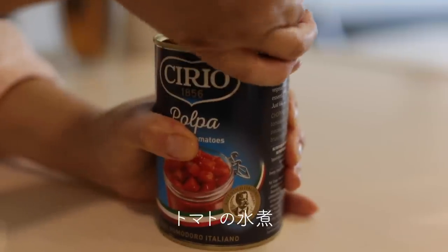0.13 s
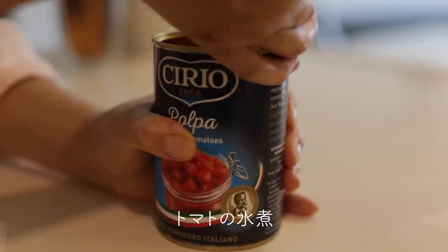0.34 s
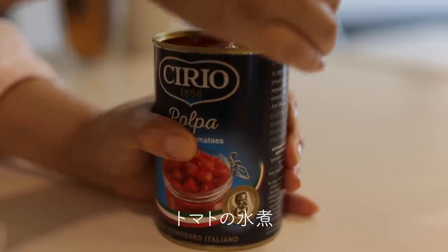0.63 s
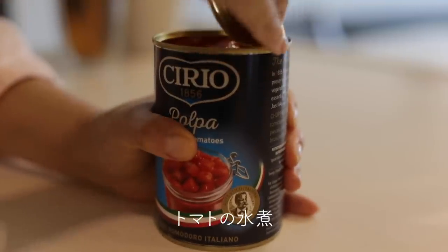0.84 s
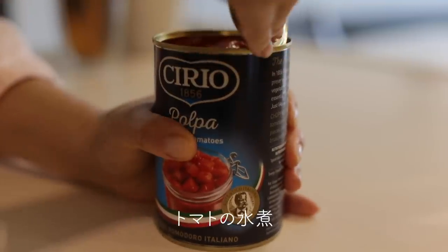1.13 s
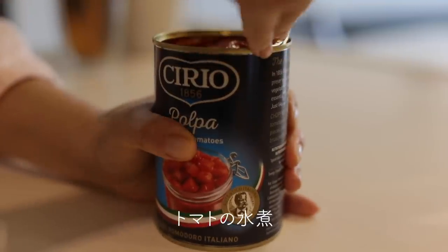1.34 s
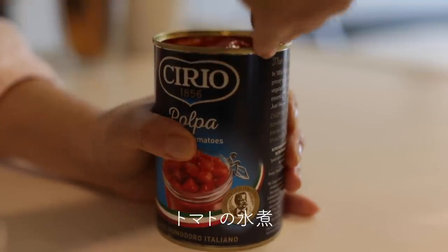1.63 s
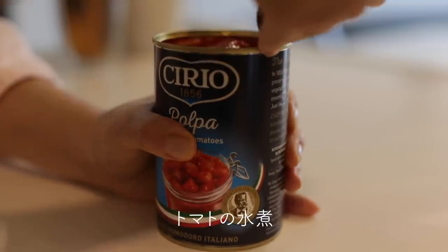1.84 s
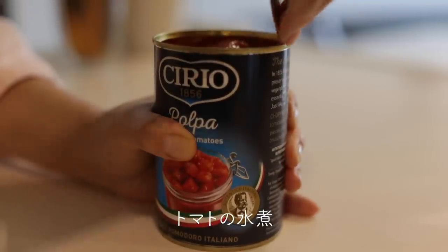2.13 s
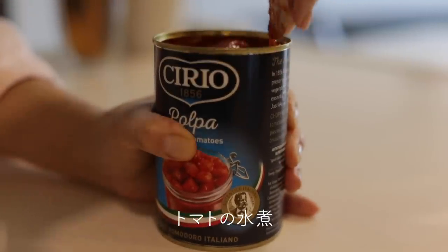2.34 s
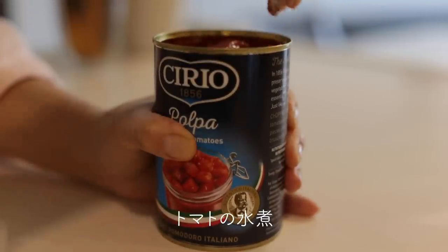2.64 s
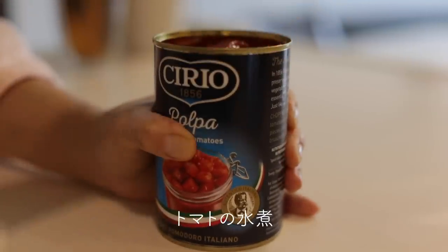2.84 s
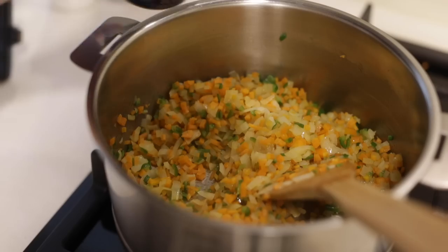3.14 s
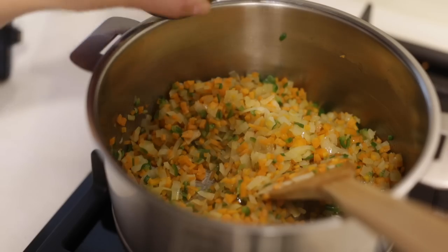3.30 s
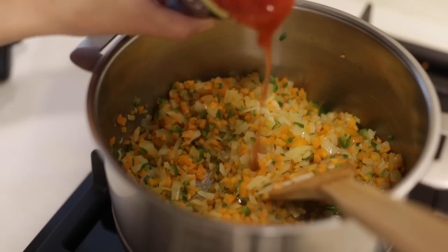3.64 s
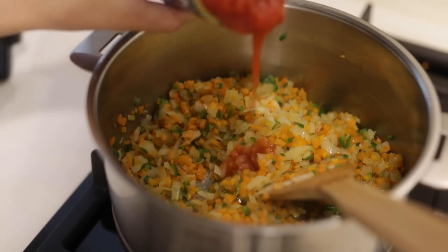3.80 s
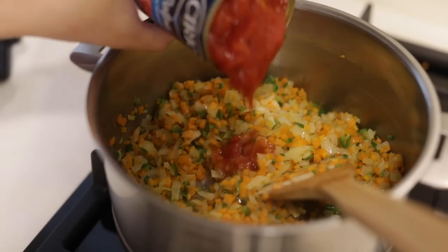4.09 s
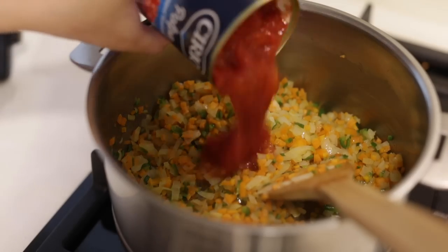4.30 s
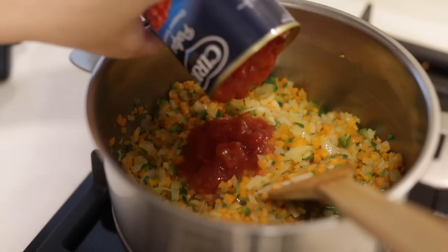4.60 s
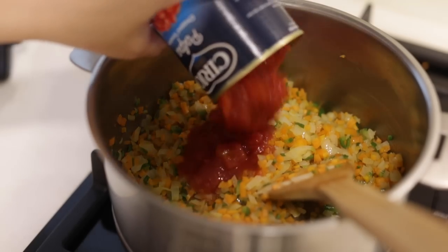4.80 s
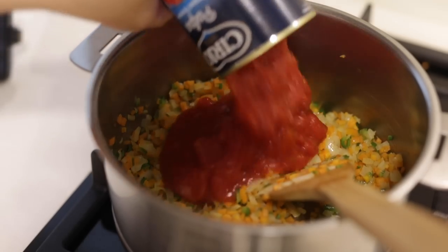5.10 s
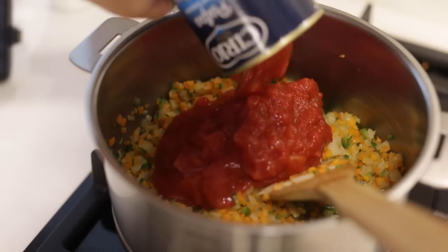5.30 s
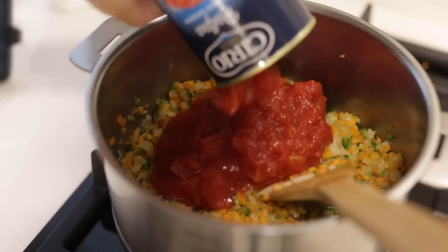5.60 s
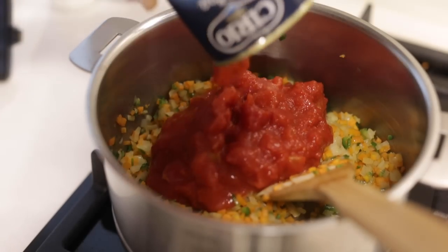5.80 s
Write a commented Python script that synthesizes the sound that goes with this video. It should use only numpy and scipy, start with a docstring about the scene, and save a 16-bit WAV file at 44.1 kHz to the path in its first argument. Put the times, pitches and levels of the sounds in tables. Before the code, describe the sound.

A metal can lid cracks open and tears free, then the can knocks a steel pot and thick pulp splats in.

```python
"""Over a fridge-like hum, a ring-pull lid tears off a full can: the scored seam rips, creaks, snaps free.
Each fracture is an impulse that excites the modes of the thin lid; friction adds a hiss and a groan.
Then, at the stove, the can knocks a steel pot into damped vibration, and thick pulp lands on the food
with resonant splats and the plops of air pockets. A small hard kitchen reverberates briefly."""
import sys
import numpy as np
from scipy import signal
from scipy.io import wavfile
from scipy.ndimage import uniform_filter1d

SR = 44100
rng = np.random.default_rng(int(sys.argv[2]) if len(sys.argv) > 2 else 0)


def unload_audio(sound):
    """Save the sound as a 16-bit wav file, at the path given as the first command line argument."""
    columns = np.transpose(np.atleast_2d(sound))
    # keep every value between -1 and 1, then stretch to whole-number steps
    steps = np.round(np.clip(columns, -1, 1) * 32767)
    wavfile.write(sys.argv[1], SR, steps.astype(np.int16))


N = 262395


def gain_of(db):
    """Amplitude ratio of a level in decibels."""
    return 10 ** (np.asarray(db) / 20)


def unit_rms(x):
    """Normalisation to rms 1."""
    return x / np.sqrt(np.mean(x ** 2) + 1e-20)


def value_at(points, hz):
    """Interpolation on a log-frequency axis."""
    point_hz, value = np.transpose(points)
    return np.interp(np.log(hz + 1), np.log(point_hz + 1), value)


def add(mix, start_s, sound):
    """Superposition of a delayed sound."""
    part = mix[round(start_s * SR):][:len(sound)]
    part += sound[:len(part)]


def colour(x, spectrum):
    """Minimum-phase filter: the phase follows from the log gain by Hilbert transform."""
    log_gain = np.log(gain_of(value_at(spectrum, abs(np.fft.fftfreq(4096, 1 / SR)))))
    taps = np.fft.ifft(np.exp(np.conj(signal.hilbert(log_gain)))).real[:2048]
    return signal.oaconvolve(x, taps)[:len(x)]


def resonate(x, hz, width_hz):
    """Forced response of one resonance, with gain near 1 at its centre."""
    radius = np.exp(-np.pi * width_hz / SR)
    return 2 * signal.lfilter([1 - radius], [1, -radius * np.exp(2j * np.pi * hz / SR)], x).real


def damped_tone(db, hz, t60_s, glide=0):
    """Free decay of an oscillator, with a soft onset; glide raises the pitch."""
    t = np.arange(8000) / SR
    envelope = gain_of(db - 60 * t / t60_s) * (1 - np.exp(-t / 0.00072))
    return envelope * np.sin(2 * np.pi * hz * t * (1 + glide * t))


def drift(top_hz):
    """Slow fluctuation of rms 1: a sum of sines in random phase."""
    t = np.arange(0, N, 64) / SR
    rates = np.geomspace(top_hz / 20, top_hz, 20)
    slow = sum(np.sin(2 * np.pi * (hz * t + rng.random())) / np.sqrt(hz) for hz in rates)
    return np.interp(np.arange(N) / SR, t, unit_rms(slow))


# Room noise spectra: frequency_hz, relative_db
COUNTER_NOISE = [(15, -51), (25, -16), (84, -7.5), (148, -9.5), (200, -6), (248, -10), (307, -8),
                 (403, -9.5), (769, -12.5), (905, -14), (2460, -17.5), (3990, -25), (15800, -38.5)]
STOVE_NOISE = [(15, -35), (25, 1), (64, 2.5), (141, -5), (316, -3.5), (425, -8.5), (834, -6.5),
               (1220, -11.5), (1550, -11.5), (3130, -17.5), (3390, -20.5), (14600, -30.5), (15800, -31)]
# Background tones: pitch_hz, rms_db
COUNTER_HUM = [(199.2, -61), (247.6, -70), (301.5, -71), (349.9, -72.5)]
STOVE_TONES = [(52, -81), (3225, -81.5)]

def background(move_s=3.05):
    """Broadband noise plus modulated tones; at move_s the listener moves from counter to stove."""
    places = []
    for spectrum, db, tones in ((COUNTER_NOISE, -57.5, COUNTER_HUM), (STOVE_NOISE, -58, STOVE_TONES)):
        sound = gain_of(db + 0.23 * drift(2.3)) * unit_rms(colour(rng.standard_normal(N), spectrum))
        for hz, tone_db in tones:
            cycles = np.cumsum(hz * (1 + 0.002 * drift(3.3))) / SR
            sound += np.sqrt(2) * gain_of(tone_db + 2.3 * drift(12)) * np.sin(2 * np.pi * cycles)
        places.append(sound)
    counter, stove = places
    moved = np.clip((np.arange(N) / SR - move_s) / 0.024, 0, 1)
    return (1 - moved) * counter + moved * stove


# Room decay, before division by the damping factor: frequency_hz, t60_s
ROOM_DECAY = [(150, 0.13), (500, 0.25), (1500, 0.22), (4000, 0.25), (8000, 0.24), (13000, 0.097)]

def reverberation(x, damping=0.8, gap_samples=200):
    """Convolution with sparse reflections of random sign; absorption depends on frequency."""
    echoes = np.zeros(SR // 2)
    slots = np.arange(gap_samples, SR // 2 - 10, 10)
    echoes[slots + rng.integers(0, 10, len(slots))] = rng.choice([-1., 1.], len(slots))
    hz, t, bands = signal.stft(echoes, SR, nperseg=256)
    decay = gain_of(-60 * t * damping / value_at(ROOM_DECAY, hz)[:, None])
    tail = signal.istft(bands * decay, SR, nperseg=256)[1]
    return signal.oaconvolve(x, tail / np.linalg.norm(tail))[:N]


# Drops and bursting pulp: start_s, peak_db, pitch_hz, q_factor, relative_snap_db
PULP_SPLATS = [(3.689, -50, 8200, 3.7, -12), (3.791, -52, 7950, 3.1, -13), (3.854, -39.5, 2950, 1.3, -13),
               (4.004, -44, 8300, 7.5, -20), (4.024, -34, 7200, 2.3, -14), (4.057, -43.5, 8300, 3.8, -3),
               (4.064, -42, 7640, 2.5, -7), (4.107, -22.5, 3330, 1.9, -38), (4.1963, -34, 6460, 2.5, -19),
               (4.421, -18.5, 9660, 4.8, -32), (4.432, -24.5, 7600, 5.4, -20.5),
               (4.909, -22.5, 8360, 9.6, -3), (4.9185, -11, 3230, 5.8, 6), (4.936, -20.5, 10200, 2.7, -9),
               (5.009, -44, 4550, 4, -5), (5.204, -32, 11700, 2.1, -5), (5.235, -41.5, 13100, 2.6, -13),
               (5.432, -53, 8730, 5, -14), (5.446, -53, 8640, 4.6, -20), (5.635, -36, 11830, 4.8, -4),
               (5.845, -43, 13520, 2.8, 9)]
# Air pockets in the pulp: start_s, level_db, pitch_hz
PULP_PLOPS = [(3.687, -47, 460), (3.719, -47, 403.4), (4.291, -29, 431), (4.634, -48.5, 610),
              (4.938, -42.5, 419), (4.953, -42.5, 251), (4.974, -43.5, 220), (5.016, -44, 680),
              (5.206, -40, 554), (5.221, -39, 580), (5.24, -33, 579), (5.257, -43, 550),
              (5.274, -46.5, 658), (5.498, -40, 571), (5.514, -48.5, 586), (5.529, -55, 638)]

def pulp(drip_count=14):
    """Impacts excite a broad resonance (splats); bubbles oscillate with rising pitch (plops)."""
    out, t = np.zeros(N), np.arange(3000) / SR
    # Faint drops fall at random from 3.7 to 5.85 s.
    drips = [(3.7 + 2.15 * when, -63 + 7 * size, 8300 * (0.85 + 0.7 * pitch ** 2), 3.6, -13)
             for when, size, pitch in rng.random((drip_count, 3))]
    for start_s, db, hz, q_factor, snap_db in PULP_SPLATS + drips:
        burst = (t == 0) + 0.11 * rng.standard_normal(len(t)) * np.exp(-t / 0.0027)
        width_hz = hz / q_factor
        ring = resonate(resonate(burst, hz, width_hz), hz, width_hz)
        highpass = signal.butter(4, min(hz * 0.91, 4000), "highpass", fs=SR, output="sos")
        splat = signal.sosfilt(highpass, unit_rms(ring) + gain_of(snap_db) * unit_rms(burst))
        add(out, start_s, gain_of(db) * splat / abs(splat).max())
    for start_s, db, hz in PULP_PLOPS:
        add(out, start_s, damped_tone(db, hz, t60_s=0.092, glide=1.4))
    return out


# Modes of the steel pot, before each blow's weighting and damping: pitch_hz, level_db, t60_s
POT_MODES = [(71.3, -4, 0.61), (107.2, -6, 0.4), (211.6, -3.5, 0.38), (257.2, -7.5, 0.27), (400, -15, 0.16),
             (497, -4.5, 0.19), (575, -1, 0.14), (610, -7.5, 0.2), (686, 2, 0.34), (940, -21.5, .15),
             (1006, -16, 0.24), (1023, -9, .2), (1054, -2, 0.15), (1112, -4, 0.25), (1128, -15, 0.78),
             (1230, 6, 0.048), (1240, -7, 0.18), (1253, -18, 0.753), (1317, -16.5, 0.56),
             (1656, -18, 0.124), (1824, -2, 0.1), (1920, -11, 0.41), (2235, -3.5, 0.17), (2390, 1.5, 0.14),
             (2510, 0, .07), (2496, 7.5, 0.07), (3770, -4, 0.14), (4546, -15, 0.06), (7140, -8, .11),
             (7700, -6, .07), (8300, -7, 0.077)]
# Blows of the can, with band weights relative to the level:
# start_s, level_db, bass_db, rim_db, middle_db, contact_s, damping_factor, stilling_s
POT_KNOCKS = [(3.4041, -16.5, -15, 2.5, -24, 0.00026, 1.41, 0.8),
              (4.198, -38.5, 15, 13, -4.5, 0.0017, 22, .05), (4.216, -26, 7, 9, 5.5, 0.0032, 4.1, 0.18),
              (4.227, -24, -5, -26, -17, 0.0078, 0.87, 0.19),
              (4.587, -29, -2.5, 1, -8.5, 0.011, 2.15, 0.044)]

def pot(belly_share=0.62, dulling_db_per_s=2197):
    """Modal vibration, weighted by the point of impact and damped by the food; the pan support rattles."""
    out, t = np.zeros(N), np.arange(SR // 2) / SR
    hz, mode_db, t60_s = np.transpose(POT_MODES)[:, :, None]
    for start_s, db, bass_db, rim_db, middle_db, contact_s, damping, stilling_s in POT_KNOCKS:
        # A long contact dulls the treble and scatters the phases.
        treble_db = -13 - dulling_db_per_s * contact_s
        phase = rng.random(hz.shape) * min(contact_s / 0.0014, 1)
        weights = [(70, bass_db), (250, bass_db), (650, belly_share * bass_db + 3), (1100, 0),
                   (1260, rim_db), (2500, middle_db), (7000, treble_db)]
        # Random sway stands for the beating of close modes.
        sway = uniform_filter1d(uniform_filter1d(rng.standard_normal((len(hz), len(t))), 500), 500)
        sway_db = 3.6 * unit_rms(sway) * np.minimum(t / 0.0176, 1)
        decay_db = 60 * t * damping / t60_s + 12 * (t / stilling_s) ** 4
        level_db = mode_db + value_at(weights, hz) + sway_db - decay_db
        ring = (gain_of(level_db) * np.sin(2 * np.pi * (hz * t + phase))).sum(0)
        rolloff = [(9500, treble_db + 0.5), (11000, treble_db - 34.5), (16000, treble_db - 54.5)]
        rattle = colour(rng.standard_normal(len(t)), [(35, bass_db - 7)] + weights + rolloff)
        rattle *= gain_of(10 - 60 * t / 0.095)
        hardness = np.exp(-contact_s / 0.00084)
        tick = gain_of(-2) * hardness * rng.standard_normal(len(t)) * np.exp(-t / 0.0019)
        onset = 1 - np.exp(-t / contact_s)
        add(out, start_s, gain_of(db) * ((ring + rattle) * onset + tick))
    return out


# The bent lid rubs the rim: start_s, length_s, crest_fraction, hiss_db, groan_db
RIM_RUBS = [(0.696, 0.16, 0.44, -69, -66), (2.158, 0.2, 0.62, -49, -40)]
# Modes of the can body: pitch_hz, width_hz, relative_db
CAN_MODES = [(272, 20, 4), (553, 41, 3), (715, 25, 9), (988, 41, 3), (1100, 43, -2), (1373, 19, -1.5)]
# Hiss of the metal edge: frequency_hz, relative_db
EDGE_HISS = [(3000, -30), (4150, -8), (5200, -14), (6300, -3), (8000, 0), (9200, -3), (10200, -24),
             (15000, -38)]

def rim_friction():
    """Sliding friction: uneven noise hisses at the edge and drives the can body into a groan."""
    out = np.zeros(N)
    for start_s, length_s, crest, hiss_db, groan_db in RIM_RUBS:
        t = np.arange(0, length_s, 1 / SR)
        noise = rng.standard_normal((2, len(t)))
        roughness_db = unit_rms(uniform_filter1d(rng.standard_normal(len(t)), 90))
        body, edge = noise * gain_of(roughness_db)
        groan = sum(gain_of(db) * resonate(body, hz, width) / np.sqrt(width) for hz, width, db in CAN_MODES)
        rub = gain_of(hiss_db) * unit_rms(colour(edge, EDGE_HISS)) + gain_of(groan_db) * unit_rms(groan)
        swell_db = np.interp(t / length_s, [0, crest, 1], [-8.5, 0, -3])
        add(out, start_s, gain_of(swell_db) * rub * signal.windows.tukey(len(t), 0.1))
    return out


# Modes of the lid, before bending shifts them: pitch_hz, width_hz, gain_db
LID_MODES = [(748, 82, 9.5), (1020, 180, 3), (1450, 44, 12.5), (2320, 160, -9), (2520, 120, 5.5),
             (3690, 140, 2), (4070, 310, 17.5), (4150, 73, 20.5), (4520, 55, 20), (4920, 110, 9),
             (6340, 34, 1), (7180, 90, 9.5), (7600, 240, 1), (8750, 60, -0.5)]
# Broad response of the lid: frequency_hz, relative_db
LID_SPECTRUM = [(88, -45), (150, -12.5), (398, -5.5), (821, -8), (1040, 1.5), (1210, 3.5), (2450, -10),
                (2920, -15.5), (4080, -20.5), (7470, -18), (16000, -19)]
# Tugs on the ring; bent far back, the lid sounds thinner. Bands are relative to the upper middle:
# from_s, bass_db, low_middle_db, treble_db, ring_db
RING_TUGS = [(0.1, -7, -4, -11.5, 1.5), (1.1, 3, 5, -8, 5), (1.6, -5.5, -0.5, -4, 0.5),
             (1.9, -11, -13, -4, -17.5), (2.3, -6, -8, -10.5, -16.5)]

def lid_response(force, start_s, bend_ratio, boost_db=(0, 0, 0)):
    """Forced vibration of a thin plate: bending shifts its modes, and each tug sets the band balance."""
    *balance_db, ring_db = [row[1:] for row in RING_TUGS if row[0] <= start_s][-1]
    ring = sum(gain_of(db + ring_db) * resonate(force, hz * bend_ratio, width_hz)
               for hz, width_hz, db in LID_MODES)
    plate = colour(force + ring, LID_SPECTRUM)
    bands_hz = (5000, 10300), (250, 1800), (2000, 4800), (10700, 16500)
    filters = [signal.butter(2, edges, "bandpass", fs=SR, output="sos") for edges in bands_hz]
    upper_middle, *others = (unit_rms(signal.sosfilt(sos, plate)) for sos in filters)
    return upper_middle + sum(gain_of(db) * band for db, band in zip(np.add(balance_db, boost_db), others))


# The full can jolts on the counter, the lid buckles: start_s, level_db, pitch_hz, t60_s
CAN_JOLTS = [(0.246, -41.5, 193.6, 0.54), (0.322, -28, 451, 0.12), (1.702, -40, 189, 0.15)]
LID_TWANGS = [(0.23, -28, 1020, 0.14), (0.363, -25, 1350, 0.046), (1.177, -48, 1026, 0.17),
              (1.756, -33.5, 1450, 0.044), (2.361, -24.5, 1045, 0.028), (2.36, -23.5, 1560, 0.015)]

def jolts_and_twangs():
    """Free vibration: each jolt or buckle rings one damped mode."""
    out = np.zeros(N)
    for start_s, db, hz, t60_s in CAN_JOLTS + LID_TWANGS:
        add(out, start_s, damped_tone(db, hz, t60_s))
    return out


# Single fractures of the seam: start_s, peak_db
SEAM_CRACKS = [(0.141, -55), (0.2257, -21), (0.2368, -14.5), (0.2465, -20), (0.2566, -16.5),
               (0.2738, -16.5), (0.2874, -19), (0.3057, -14), (0.3238, -11), (0.3385, -6.5), (0.346, -9),
               (0.354, -11.5), (0.364, -14.5), (0.387, -17), (1.1763, -32.5), (1.1954, -34.5), (1.219, -40),
               (1.232, -51), (1.3125, -42.5), (1.3517, -35.5), (1.4402, -37.5), (1.6422, -31.5),
               (1.6803, -19.5), (1.6948, -23.5), (1.7094, -23.5), (1.7257, -29), (1.763, -32.5),
               (1.7889, -28.5), (1.8318, -35), (1.8669, -35), (1.948, -40), (1.9645, -33), (1.9748, -23.5),
               (1.9993, -28), (2.0233, -35), (2.0412, -31), (2.063, -32), (2.092, -28.5), (2.1024, -27),
               (2.113, -21), (2.13, -21.5), (2.136, -22), (2.1465, -16), (2.1526, -22.5), (2.3595, -11)]

def seam_cracks():
    """Impulse excitation: one sharp break, then a burst of splinters, rings the lid."""
    out, t = np.zeros(N), np.arange(3000) / SR
    for start_s, db in SEAM_CRACKS:
        noise = rng.standard_normal(len(t))
        force = (t == 0) + 0.17 * noise * np.exp(-t / 0.0047)
        crack = lid_response(force, start_s, bend_ratio=1 + 0.018 * noise[-1])
        add(out, start_s, gain_of(db) * crack / abs(crack).max())
    return out


# Running tears, one envelope for each: time_s, gain_db
SEAM_RIPS = [
    [(0.226, -49), (0.24, -33), (0.266, -32), (0.35, -24), (0.362, -31.5), (0.405, -44)],
    [(1.675, -46), (1.681, -48), (1.715, -53), (1.775, -65)],
    [(1.94, -77), (1.976, -53), (2.086, -57), (2.11, -56), (2.152, -40.5), (2.165, -36)],
]

def seam_rips(slips_per_s=2800):
    """Shot noise: dense random slips drive the lid into a crackle, fuller than a single crack."""
    out = np.zeros(N)
    for envelope in SEAM_RIPS:
        times, db = np.transpose(envelope)
        t = np.arange(times[0], times[-1], 1 / SR)
        slip_db = 3.8 * np.minimum(rng.exponential(1, len(t)), 3.2)
        slips = gain_of(slip_db) * (rng.random(len(t)) < slips_per_s / SR)
        slips *= rng.choice([-1, 1], len(t))
        crackle = lid_response(slips, times[0], bend_ratio=1.015, boost_db=(8.5, 10.5, 7))
        add(out, times[0], gain_of(np.interp(t, times, db)) * crackle * signal.windows.tukey(len(t), 0.06))
    return out


def scene():
    """Direct sound plus reverberant field; the corner at the stove absorbs more."""
    can = seam_cracks() + seam_rips() + jolts_and_twangs() + rim_friction()
    knocks, wet = pot(), pulp()
    facing = 2 * np.pi * 7 * np.arange(N) / SR  # the reverberation of the can changes from crack to crack
    room = gain_of(-7.5) * (reverberation(can * np.cos(facing)) + reverberation(can * np.sin(facing)))
    room += reverberation(gain_of(-6) * knocks + gain_of(-8.5) * wet, damping=1.05, gap_samples=120)
    return (can + knocks + wet + room + background())[None]


def record(dry):
    """Band limiting: the response falls off below 45 Hz and drops steeply near 16 kHz, and a steep low-pass
    follows."""
    heard = colour(dry[0], [(25, -21.5), (45, -2.0), (15700, 0.5), (16000, -20.0)])[None]
    lowpass = signal.firwin(511, 16600, window=("kaiser", 9), fs=SR)
    return signal.oaconvolve(heard, lowpass[None], "same")


dry = scene()
out = record(dry)
unload_audio(out)
```